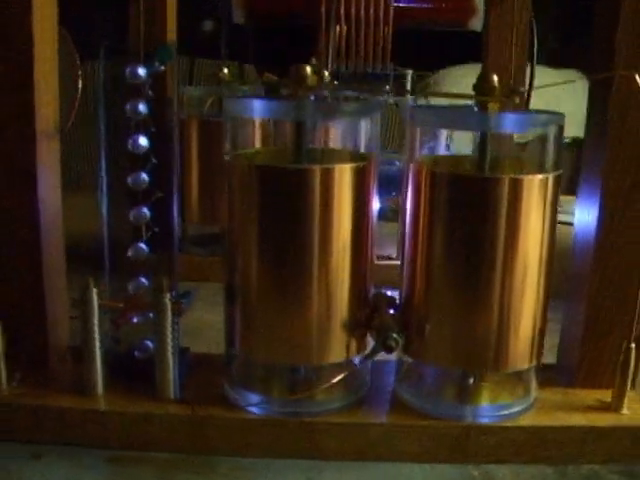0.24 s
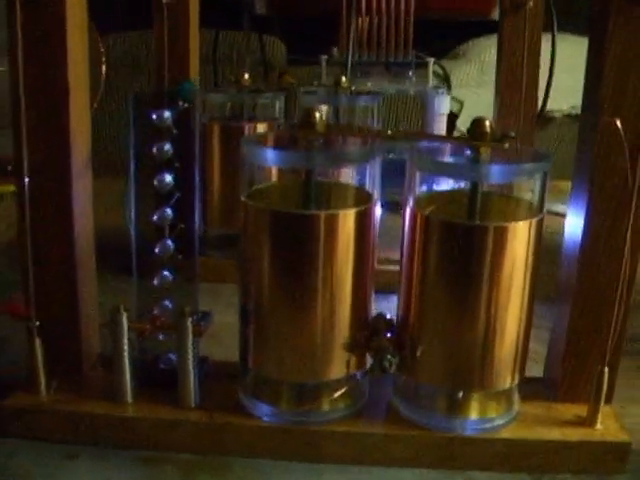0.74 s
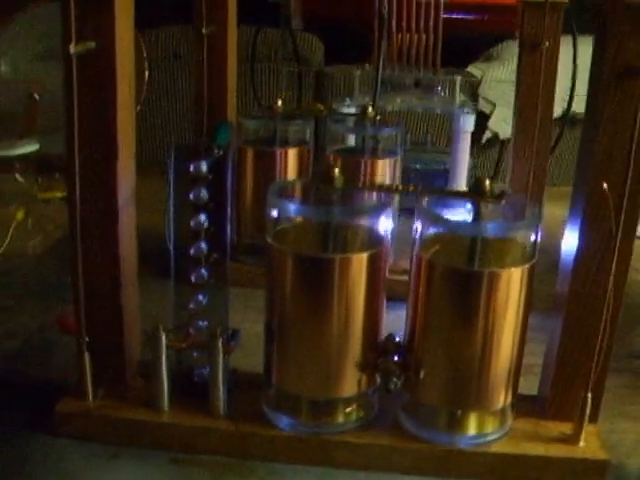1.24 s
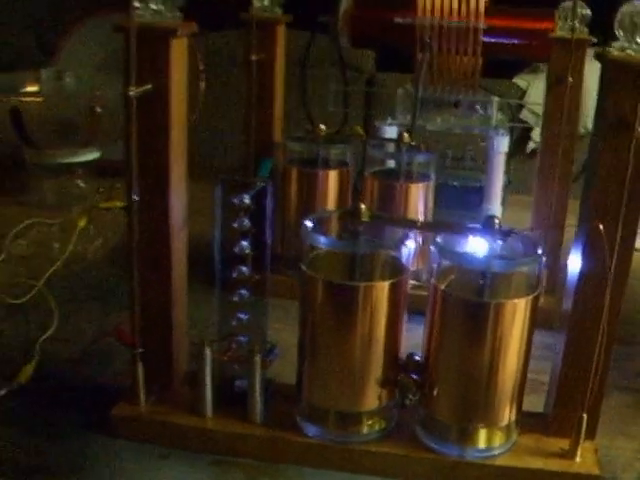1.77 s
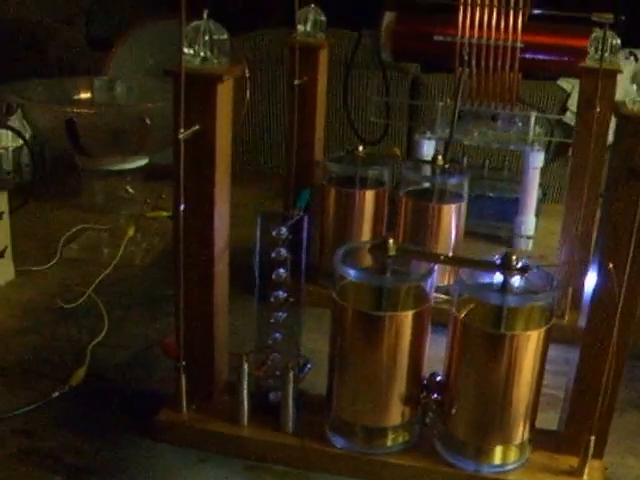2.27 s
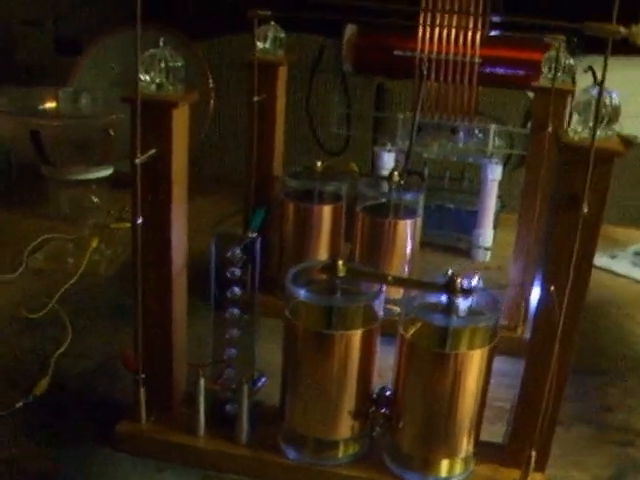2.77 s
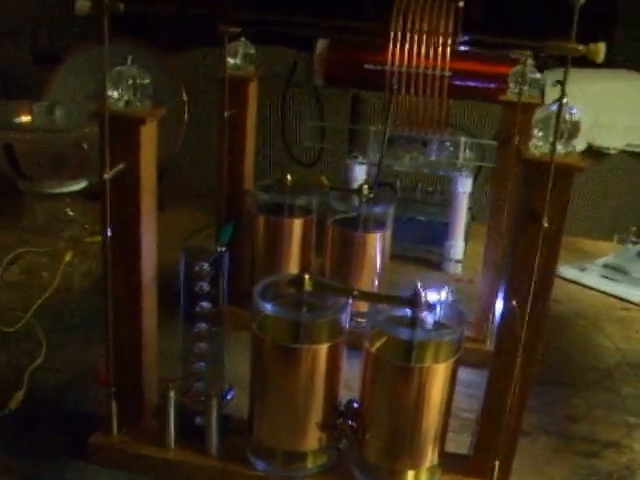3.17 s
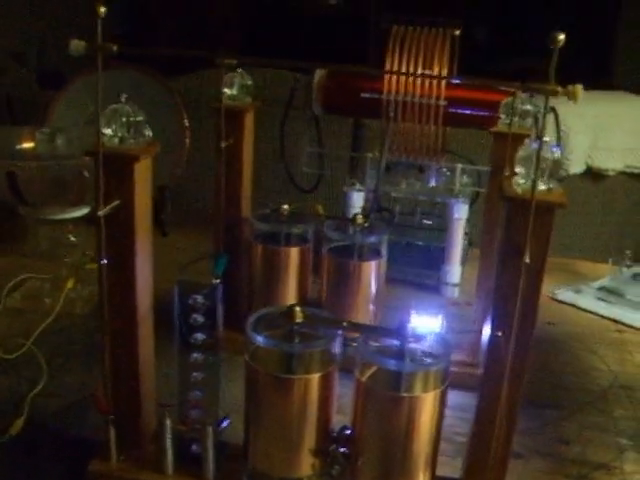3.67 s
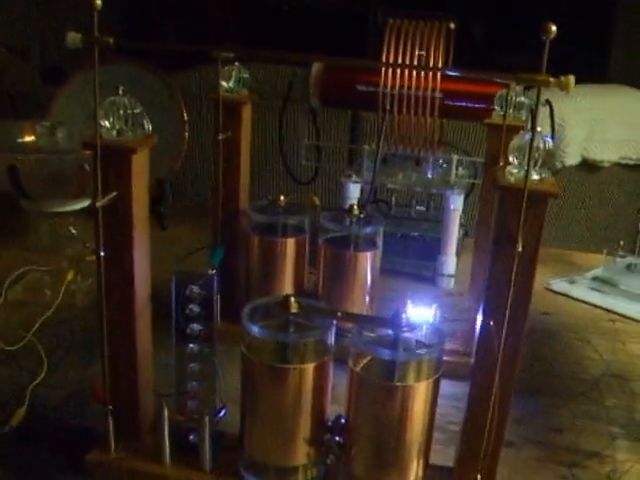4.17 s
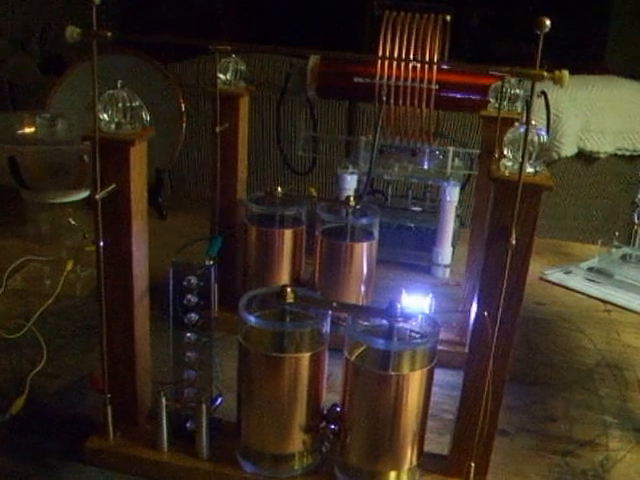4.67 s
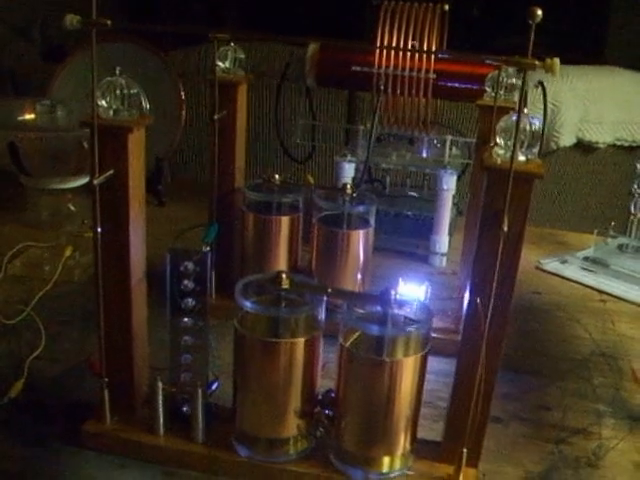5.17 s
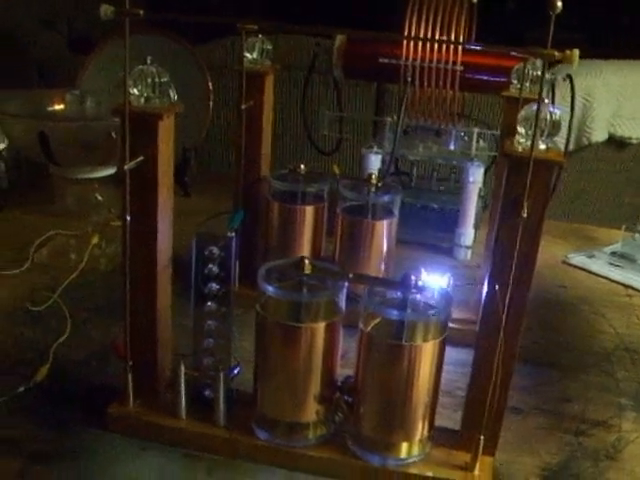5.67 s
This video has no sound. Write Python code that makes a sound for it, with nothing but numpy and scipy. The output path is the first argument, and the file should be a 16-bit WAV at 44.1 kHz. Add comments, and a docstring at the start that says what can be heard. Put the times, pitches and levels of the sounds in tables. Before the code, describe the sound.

Steady electric arcing fills the whole stretch, already running at the start and never stopping. The buzz is dry, crackly and treble-heavy, with little bass and a hissy edge from short reflections off the bench, jars and a nearby hard surface. The moving hand-held microphone sweeps its tone as it retreats, with soft low handling rumble near the middle. Low mains hum and room noise sit far below.

```python
"""A workbench in a room: a spark gap fires once in every half cycle of the mains, over steady mains tones.
Each crack is a click shaped by filters. It arrives directly, off the bench, scattered by the jars around
the gap, twice off a hard surface, off a far wall, as a dull late echo and as room tail.
A hand-held microphone backs away and rises, shifting these levels, lags and colours.
Sines at mains multiples make hum and buzz; filtered noise makes the floor and the handling rumble."""
import sys
import numpy as np
from scipy import signal
from scipy.fft import rfft, irfft
from scipy.io import wavfile

SR = 44100
rng = np.random.default_rng(int(sys.argv[2]) if len(sys.argv) > 2 else 0)


def inscribe(sig):
    """Save sig as 16-bit PCM at rate SR to the path in sys.argv[1].

    A 1-D sig is mono; a 2-D sig holds one channel per row.
    Samples are clipped to [-1, 1] before scaling.
    """
    pcm = np.round(np.clip(np.atleast_2d(sig).T, -1, 1) * 32767)
    wavfile.write(sys.argv[1], SR, pcm.astype(np.int16))


N = 261513
MAINS_HZ = 60.0


def from_db(db):
    """Level in dB to amplitude."""
    return 10 ** (np.asarray(db) / 20)


def rms_one(x):
    """Scales a signal to an rms of 1."""
    return x / np.sqrt(np.mean(x ** 2) + 1e-20)


def columns(rows, s):
    """Table columns read at the positions s of the first column."""
    t, *rest = np.transpose(rows)
    return [np.interp(s, t, c) for c in rest]


def band_noise(band_hz):
    """Noise between two frequencies, at an rms of 1."""
    band = signal.butter(2, band_hz, "band", fs=SR, output="sos")
    return rms_one(signal.sosfilt(band, rng.standard_normal(N)))


def colour(x, spectrum):
    """Causal (minimum-phase) filter with the spectrum in dB, built by folding its cepstrum."""
    size = 8192
    hz, db = np.transpose(spectrum)
    bins_hz = np.arange(size // 2 + 1) * SR / size
    db = np.interp(np.log(bins_hz + 1), np.log(hz), db)
    cepstrum = irfft(db * np.log(10) / 20, size)
    cepstrum[1:size // 2] *= 2
    cepstrum[size // 2 + 1:] = 0
    response = irfft(np.exp(rfft(cepstrum)), size)[:size // 2]
    return signal.oaconvolve(x, response)[:N]


def clicks(s, sizes):
    """Impulses at times between samples, as short windowed sincs."""
    at = np.floor(s * SR).astype(int)[:, None] + np.arange(-7, 9)
    off = at - s[:, None] * SR
    keep = (at >= 0) & (at < N)
    taps = sizes[:, None] * np.sinc(off) * np.cos(np.pi * off / 16) ** 2
    return np.bincount(at[keep], taps[keep], N)


def ring(x, hz, t60):
    """A two-pole resonator: a unit click sets a dying sine of starting height 1 ringing."""
    r, w = from_db(-60 / (t60 * SR)), 2 * np.pi * hz / SR
    return signal.lfilter([0, np.sin(w)], [1, -2 * r * np.cos(w), r * r], x + 1e-18)


# The microphone's path, as heard in the lags:
# (time [s], direct arrival after zero crossing [ms], surface echo after direct [ms], surface echo level [dB])
MIC_PATH = [(0, 5.14, 4.55, 4), (.7, 5.25, 4.12, 6), (1.4, 5.4, 3.76, 6), (2.5, 5.61, 3.28, 7),
            (2.9, 5.6, 3.18, 7), (3.6, 5.59, 3.11, 3), (5.0, 5.43, 3.08, 3.3), (5.93, 5.44, 3.07, 3.5)]


def travelled(s):
    """Share of the path covered, 0-1, read off the shrinking lag of the surface echo."""
    surface_ms = columns(MIC_PATH, s)[1]
    first_ms, last_ms = MIC_PATH[0][2], MIC_PATH[-1][2]
    return (first_ms - surface_ms) / (first_ms - last_ms)


def arrival(s, sizes, table):
    """Clicks whose colour blends from the near through the midway to the far column along the path."""
    hz, *stages = np.transpose(table)
    stage = np.interp(travelled(s), [0, .57, 1], range(3))   # the midway colour holds at .57 of the path
    out = np.zeros(N)
    for k, db in enumerate(stages):
        weight = np.clip(1 - np.abs(stage - k), 0, 1)
        out += colour(clicks(s, sizes * weight), np.c_[hz, db])
    return out


def echoes(s, sizes, t60, start, count):
    """Dense dying reflections; their pattern blends through several draws as the microphone moves."""
    t = np.arange(round(t60 * SR)) / SR
    moved = (count - 1) * (.8 * travelled(s) + .2 * s / s[-1])   # the hand never rests
    out = np.zeros(N)
    for k in range(count):
        weight = np.cos(np.pi / 2 * np.clip(moved - k, -1, 1))
        build = np.clip(t / start, 0, 1) ** 2
        tail = rng.standard_normal(len(t)) * from_db(-60 * t / t60) * build
        out += signal.oaconvolve(clicks(s, sizes * weight), tail / np.linalg.norm(tail))[:N]
    return out


# Tilt of the steady noise: (frequency [Hz], relative density [dB per Hz])
NOISE_TILT = [(20, -14.5), (60, -15.5), (150, -14.5), (400, -13.5), (1000, -12.5), (1500, -14.5),
              (2050, -13.5), (3000, -12), (8000, -14.5)]
# The hand shifts on the microphone: (time [s], rumble level [dB], length between 1/e points [s])
HAND_SHIFTS = [(1.695, -66, .3), (2.65, -59.5, .12), (2.85, -56.5, .12), (3.114, -58, .08),
               (3.222, -56, 0.14), (3.93, -61, 0.24)]


def floor():
    """Room and microphone noise, with low rumble and a slow sway from the hand."""
    floor_db, rumble_db, sway_db = -48.5, -74, -59
    t = np.arange(N) / SR
    noise = rms_one(colour(rng.standard_normal(N), NOISE_TILT))
    rumble, sway = band_noise([8, 24]), band_noise([1.5, 9])
    swell = from_db(rumble_db)
    for s, db, length in HAND_SHIFTS:
        swell = swell + from_db(db) * np.exp(-(2 * (t - s) / length) ** 2)
    return from_db(floor_db) * noise + swell * rumble + from_db(sway_db) * sway


# Steady tones at mains multiples: hum, plus buzz of the repeating cracks and their echoes, each loudest at one place:
# (mains multiple, loudest level [dB], drop far from there [dB], place [share of path], width [share of path])
MAINS_TONES = [(2, -66.5, 17.5, .8, 0.36), (4, -63, 22, 0.74, 0.44), (6, -69.5, 10.5, .6, 0.47),
               (8, -80.5, 9.5, 0.74, 0.5), (10, -74.5, 16, 1, 0.13), (12, -79, 24, 0.81, 0.23),
               (15, -69.5, 18.5, 0.98, 0.66), (20, -73, 20.5, 0.77, 0.069), (22, -64.5, 15.5, 0.92, 0.06),
               (24, -67.5, 16.5, 0.87, 0.15), (28, -71, 16, 0.96, .1), (30, -65, 19.5, 0.18, .35),
               (32, -59.5, 29, .62, .08), (34, -61, 26, .73, 0.14)]
# Starting phase of each tone: (phase [rad])
TONE_PHASES = [2.5, 1.2, 0.9, -0.5, 1.7, -3, 1, 3.3, -1.5, -3.5, 1.6, -0.34, 2.2, .3]


def mains_tones():
    """Sines at mains multiples, mostly even: hum, plus buzz of the cracks and their echoes; all waver slowly."""
    waver_db = 1.3   # rms
    t = np.arange(N) / SR
    away = travelled(t)
    slow = signal.butter(2, 12, fs=SR, output="sos")
    wavers = rms_one(signal.sosfilt(slow, rng.standard_normal((len(MAINS_TONES), N))))
    out = np.zeros(N)
    for tone, phase, waver in zip(MAINS_TONES, TONE_PHASES, wavers):
        multiple, top_db, fall_db, place, width = tone
        distance = (away - place) / width
        db = top_db - fall_db * (1 - np.exp(-distance ** 2)) + waver_db * waver
        hz = round(multiple) * MAINS_HZ
        out += np.sqrt(2) * from_db(db) * np.cos(2 * np.pi * hz * t + phase)
    return out


# Room tail colour: (frequency [Hz], level [dB])
ROOM_COLOUR = [(200, -11), (600, -16), (1200, -10), (2100, -2), (3000, 4), (3600, -1), (4050, -0.5),
               (4400, -3), (5300, 0), (7000, -2.5), (8300, 0.5)]


def room_tail(s, strength):
    """Long reverberation of every crack; its level settles early on the path."""
    near_db, far_db, settles = 13, 3.5, 3.3   # settles: power of the path left
    t60_s, builds_s = 0.45, 0.002
    db = far_db + (near_db - far_db) * np.abs(1 - travelled(s)) ** settles
    return colour(echoes(s, strength * from_db(db), t60_s, builds_s, count=8), ROOM_COLOUR)


# Dull late echo: (frequency [Hz], level [dB])
LATE_ECHO_COLOUR = [(1500, -28.5), (2600, -10.5), (4200, -11), (5500, -33.5), (8500, -29)]


def late_echo(s, strength):
    """A single dull echo that comes up only towards the far end of the path."""
    lag_ms = 6.4
    return colour(clicks(s + lag_ms / 1000, strength * travelled(s) ** 4), LATE_ECHO_COLOUR)


# Things near the gap that ring on, each with its own balance of near and far:
# (frequency [Hz], T60 [s], near level [dB], far level [dB])
RINGING_JARS = [(4094, 0.035, -42.5, -34), (5350, 0.015, -32, -24), (5773, 0.017, -36, -35.5),
                (3160, 0.0081, -27.5, -26.5), (2454, 0.013, -36.5, -31.5), (1390, .012, -28.5, -34),
                (910, 0.0075, -23.5, -42)]


def jars(s, strength):
    """Each crack strikes a set of short, damped resonances near the gap."""
    away = travelled(s)
    out = np.zeros(N)
    for hz, t60, near_db, far_db in RINGING_JARS:
        db = near_db + (far_db - near_db) * away
        out += ring(clicks(s, strength * from_db(db)), hz, t60)
    return out


# Scatter colour: (frequency [Hz], level [dB])
SCATTER_COLOUR = [(500, -15), (2000, -3.5), (3000, 0), (3600, 1.5), (4050, 0), (4450, -1.5), (5300, -7.5),
                  (7000, -2), (8500, -1)]


def scatter(s, strength):
    """Very short, dense reflections among the jars, falling as the microphone backs away."""
    near_db, far_db = 10, -5
    t60_s, builds_s = .024, 0.0011
    db = near_db + (far_db - near_db) * travelled(s)
    return colour(echoes(s, strength * from_db(db), t60_s, builds_s, count=14), SCATTER_COLOUR)


# Hard surface: (frequency [Hz], near level [dB], midway level [dB], far level [dB])
SURFACE_COLOUR = [(500, -12.5, -5, -6), (1500, -0.5, -12, -26.5), (2530, -3.5, -10.5, -5.5),
                  (3400, -9.5, 0, 4.5), (4460, -12.5, -14, -9), (5730, -14, -4.5, 2), (6100, 4.5, 0, -4),
                  (7370, 0, -1.5, -1.5), (8770, 3.5, 3, 5)]
# Far wall: (frequency [Hz], near level [dB], midway level [dB], far level [dB])
WALL_COLOUR = [(500, -31, -28, -21), (2000, -7.5, -19, -24.5), (3500, -8.5, -5.5, -18),
               (5500, -10.5, -16.5, -22.5), (7300, -9, -3, -5.5), (8500, -15, -6.5, -10)]


def surface_and_wall(s, strength):
    """The surface returns the spark and its image in the bench; a farther wall repeats the pair."""
    pair_ms, wall_ms = .4, 7.0   # image after the surface echo, wall after the pair
    wander_db, wander_ms = .8, .01   # each arc takes a new track, so its echoes change in level and lag
    _, surface_ms, surface_db = columns(MIC_PATH, s)
    level_track, lag_track = rng.standard_normal((2, len(s)))
    bounce = strength * from_db(surface_db + wander_db * level_track)
    image_ms = surface_ms + pair_ms + wander_ms * lag_track
    pair_s = np.r_[s + surface_ms / 1000, s + image_ms / 1000]
    pair = np.r_[bounce, .9 * bounce]
    return arrival(pair_s, pair, SURFACE_COLOUR) + arrival(pair_s + wall_ms / 1000, pair, WALL_COLOUR)


def direct_sizes(s, strength):
    """Size of the direct crack, falling along the path."""
    near_db, far_db = 7.5, -1
    return strength * from_db(near_db + (far_db - near_db) * travelled(s))


# Bench bounce along the path: (place [share of path], lag [ms], level against direct sound [dB])
BENCH_BOUNCE = [(.3, .42, -4), (.64, .2, -12), (1, .21, -1.5)]
# A small board returns only the treble: (frequency [Hz], level [dB])
BENCH_COLOUR = [(1000, -12), (3500, 0)]


def bench(s, strength):
    """One bounce off the bench, close behind the direct crack."""
    lag_ms, db = columns(BENCH_BOUNCE, travelled(s))
    return colour(clicks(s + lag_ms / 1000, direct_sizes(s, strength) * from_db(db)), BENCH_COLOUR)


# Direct crack: (frequency [Hz], near level [dB], midway level [dB], far level [dB])
DIRECT_COLOUR = [(500, -2, -1.5, -2), (750, 5, -1.5, -2), (1000, 3, -1.5, -5), (1400, 4, 1, -1),
                 (1940, 5.5, 0, -9.5), (2700, -2.5, -5, 4), (3420, -7.5, -2, 7.5), (4080, -7, -4, 1.5),
                 (4400, -1.5, -0.5, -2), (5500, -8, 4.5, 4), (6500, -1, 5.5, 0), (7500, -7, 5, 1),
                 (8500, 2.5, -2.5, -3.5)]


def direct_crack(s, strength):
    """The spark straight to the microphone, each arc's new track changing its level a little."""
    wander_db = .8
    wander = from_db(wander_db * rng.standard_normal(len(s)))
    return arrival(s, direct_sizes(s, strength) * wander, DIRECT_COLOUR)


# Spells in which the sparks wait two ripples: (time at the microphone [s], length [half cycles])
LATE_SPELLS = [(.281, 4), (.489, 2), (1.256, 2), (1.381, 2), (2.047, 1), (2.797, 1), (2.897, 1), (3.289, 3),
               (3.397, 3), (3.647, 1), (3.697, 1), (3.964, 2), (4.231, 1), (4.289, 1), (4.364, 1),
               (4.731, 4), (4.839, 1), (5.631, 2)]
# How common late sparks are over time, in rougher and cleaner stretches: (time [s], factor on their share [ratio])
LATE_SHARE = [(0, 1.5), (.55, .9), (.63, .1), (.77, .1), (.85, 1.3), (1.65, 1.5), (1.72, .4), (2.4, .8),
              (2.8, 1.7), (3.05, .6), (3.9, .5), (4.4, 1.5), (4.87, 1.7), (4.92, .1), (5.0, 1.1),
              (5.93, .9)]
# Half cycles in which the gap barely breaks down: (time at the microphone [s], level change [dB], wait [ripples])
WEAK_SPARKS = [(2.0555, -20, 0), (5.649, -24, 4)]


def sparks():
    """Arrival time and strength of each crack: near the crest, or whole ripples late."""
    step_ms = 0.485   # the charging voltage ripples, so a spark that misses its crest waits a whole ripple
    spread_db, late_gain_db = .6, .8   # late_gain: after a wait of one ripple
    polarity_ms, polarity_db = .05, .6   # positive half cycles: later if they do not wait, and harder
    around_spell_share = .4   # chance that the two sparks on either side of a spell wait one ripple
    early_ms, recovery_db = .75, 3   # the two sparks after a misfire: one early, the next harder
    count = round(N / SR * 2 * MAINS_HZ)
    half = np.arange(count) / (2 * MAINS_HZ)
    positive = np.arange(count) % 2 == 0
    direct_ms = columns(MIC_PATH, half)[0]

    # the positive arc strikes less surely: it is late more often and jitters more
    late_chance = np.where(positive, .27, .055) * columns(LATE_SHARE, half)[0]
    jitter_ms = np.where(positive, .028, .014)
    luck = rng.random((count, 2))
    ripples = (luck[:, 0] < late_chance) * 1.0
    for when, length in LATE_SPELLS:
        k = np.abs(half + direct_ms / 1000 - when).argmin()
        around = np.r_[k - 2, k - 1, k + length, k + length + 1]
        ripples[around] = np.maximum(ripples[around], luck[around, 1] < around_spell_share)
        ripples[k:k + length] = 2

    late_ms = step_ms * ripples + polarity_ms * positive * (ripples == 0)
    late_ms += jitter_ms * rng.standard_normal(count)
    db = spread_db * rng.standard_normal(count) + late_gain_db * (ripples == 1) + polarity_db * positive
    times = half + (direct_ms + late_ms) / 1000
    for when, weak_db, waited in WEAK_SPARKS:
        k = np.abs(half + (direct_ms + step_ms * waited) / 1000 - when).argmin()
        db[k] += weak_db
        times[k] += step_ms * (waited - ripples[k]) / 1000
        # the charge left over fires the next spark early; the second waits two ripples
        times[k + 1] -= (late_ms[k + 1] + early_ms) / 1000
        times[k + 2] += step_ms * (2 - ripples[k + 2]) / 1000
        db[k + 2] += recovery_db
    return times, from_db(db)


# The spark through the microphone: (frequency [Hz], level [dB])
CRACK_COLOUR = [(100, -44), (300, -29.5), (600, -22.5), (1100, -19), (1600, -19.5), (1800, -24),
                (2050, -28.5), (2300, -28), (2600, -21.5), (3200, -17.5), (4200, -13), (5200, -13),
                (6200, -7), (7200, -4), (7800, -7), (8300, -20.5)]


def gap():
    """All arrivals of the sparks, summed and given the common colour of the crack, polarity flipped."""
    s, strength = sparks()
    sound = room_tail(s, strength) + late_echo(s, strength)
    sound += jars(s, strength) + scatter(s, strength)
    sound += surface_and_wall(s, strength) + bench(s, strength)
    sound += direct_crack(s, strength)
    return -colour(sound, CRACK_COLOUR)


def scene():
    """Everything at one microphone."""
    return (floor() + mains_tones() + gap())[None]


def band_limit(x):
    """A steep low-pass at the top of the band."""
    return signal.sosfilt(signal.butter(12, 9240, fs=SR, output="sos"), x)


def record(dry):
    """A low sampling rate cuts the top steeply without delay; the converter has a small offset."""
    stop_hz, offset = 8800, -0.0022
    steep = signal.cheby2(14, 40, stop_hz, fs=SR, output="sos")
    cut = signal.sosfiltfilt(steep, dry)
    return band_limit(cut + offset)


dry = scene()
out = record(dry)
inscribe(out)
```